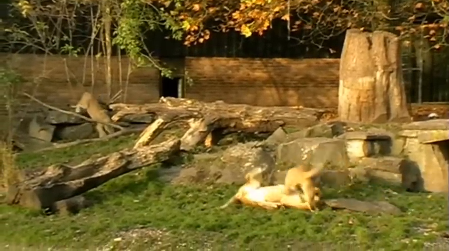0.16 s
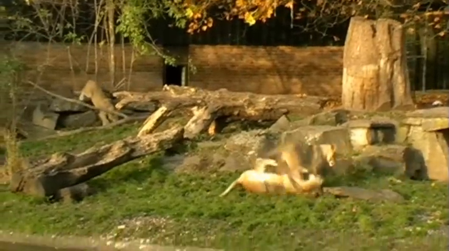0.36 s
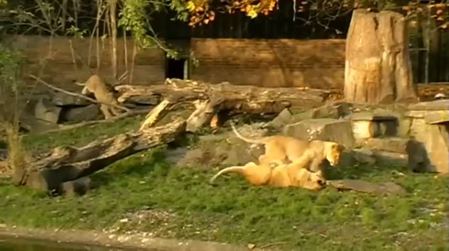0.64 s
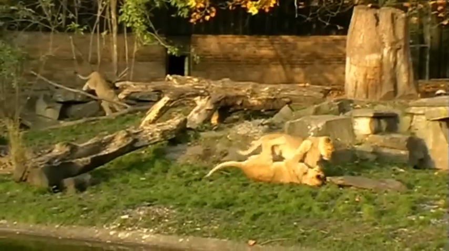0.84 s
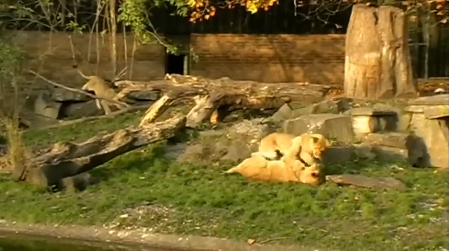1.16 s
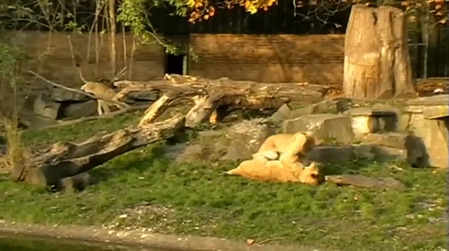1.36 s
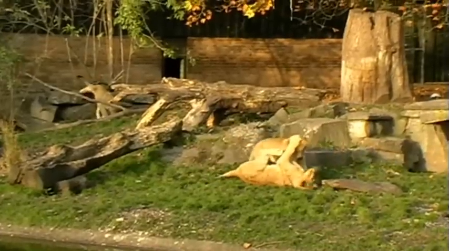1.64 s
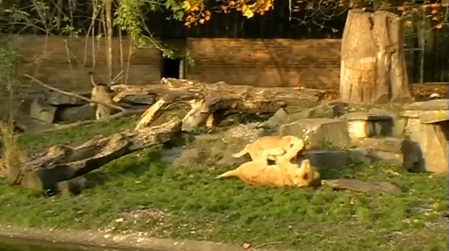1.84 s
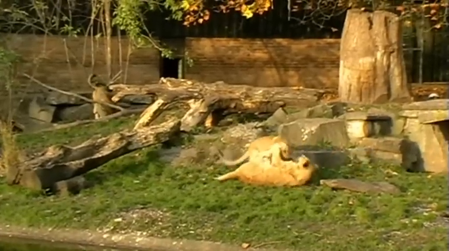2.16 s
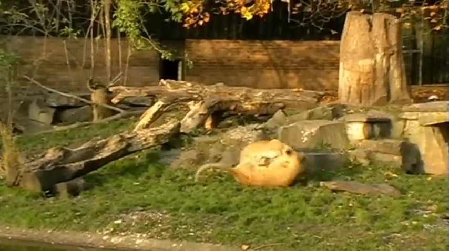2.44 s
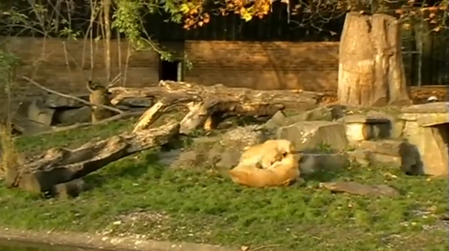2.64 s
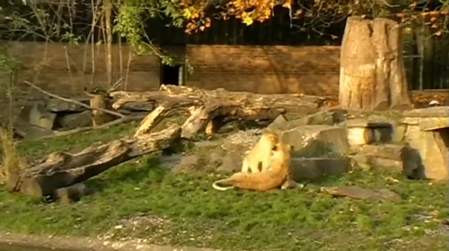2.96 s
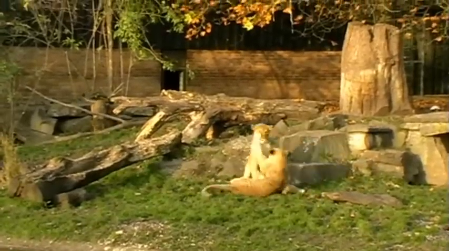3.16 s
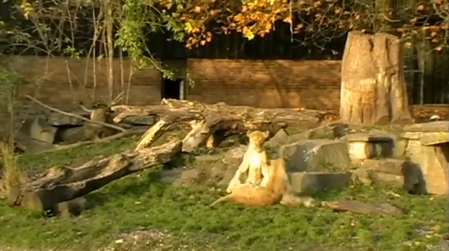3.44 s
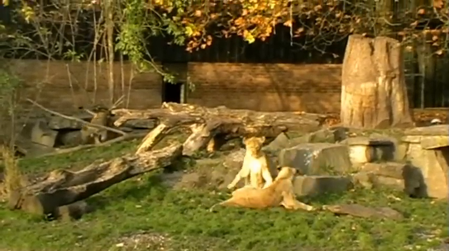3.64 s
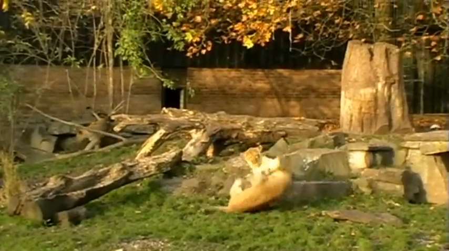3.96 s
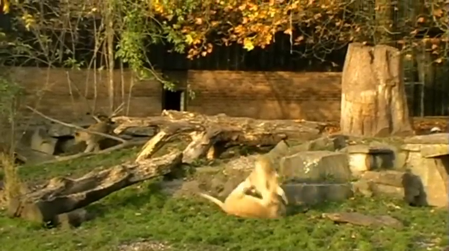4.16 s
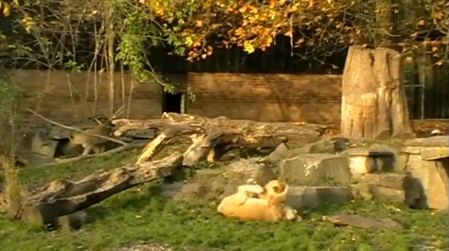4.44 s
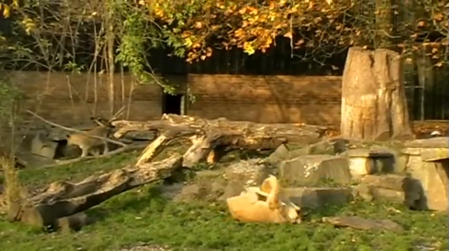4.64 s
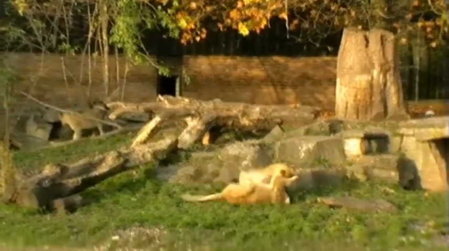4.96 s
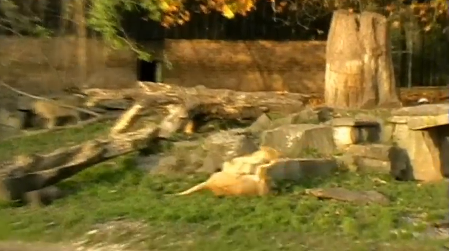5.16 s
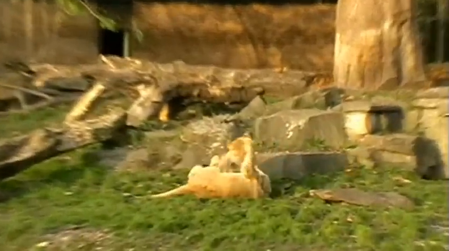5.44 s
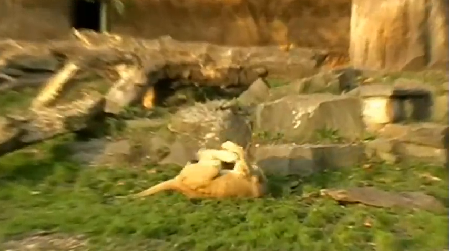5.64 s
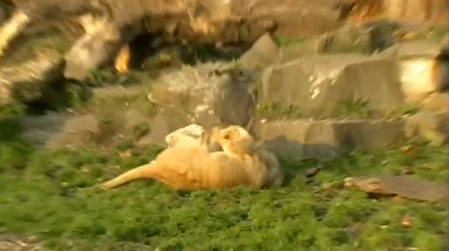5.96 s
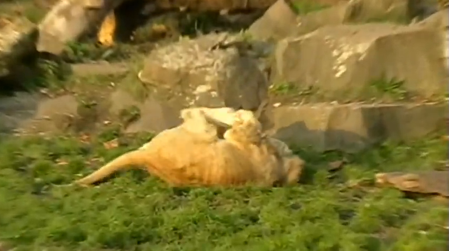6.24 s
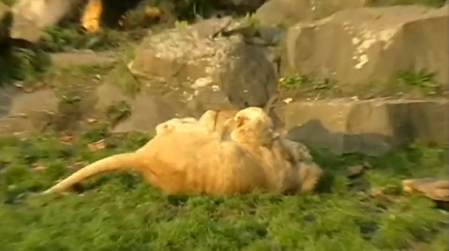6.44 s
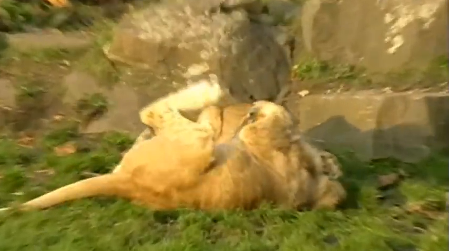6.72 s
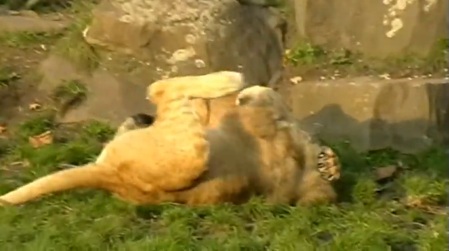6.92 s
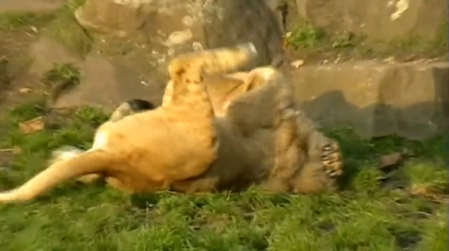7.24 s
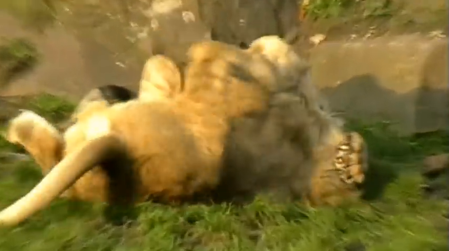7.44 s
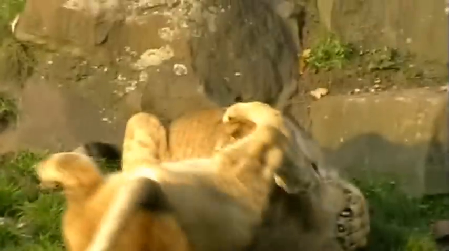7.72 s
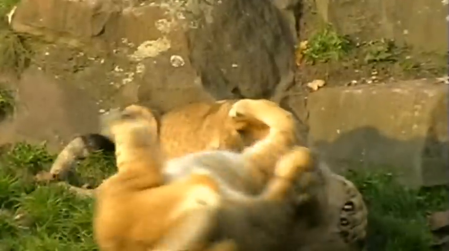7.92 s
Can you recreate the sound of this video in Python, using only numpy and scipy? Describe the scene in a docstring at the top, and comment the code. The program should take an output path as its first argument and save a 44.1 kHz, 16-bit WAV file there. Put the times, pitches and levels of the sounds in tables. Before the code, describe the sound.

An adult lion roars in a hard-walled, echoing zoo enclosure. A tailing moan opens, then heavy roars fall in pitch and turn raspy, with hooting moans between them. A clean hum leads into a roar halfway through; afterward come short grunts about a second apart. Faint scuffs, a few sharper ticks and one tiny squeak sound close by. Steady low-toned noise lies beneath, captured by two close-set microphones.

```python
"""A hard-walled, echoing zoo enclosure, heard by two microphones set close together. A lion roars:
each roar falls in pitch and grows raspier, twice led in by a clean hum, with moans in between; the
bout shortens to spaced grunts. The voice is pulses and turbulence of the vocal folds through resonances
of throat and mouth, with hiss on top. Shaped noise makes scuffs and a brief hiss nearby, gliding tones
a squeak. Decaying noise echoes the sounds, standing waves ring, and steady coloured noise lies beneath."""
import sys
import numpy as np
from scipy import signal
from scipy.fft import rfft, irfft
from scipy.io import wavfile
from scipy.ndimage import uniform_filter1d, map_coordinates

SR = 44100
rng = np.random.default_rng(int(sys.argv[2]) if len(sys.argv) > 2 else 0)


def wrap_up_sound(samples):
    """Save the sound to the file named by the first command line argument, as 16-bit audio."""
    columns = np.atleast_2d(samples).T
    # keep every value between -1 and 1, then stretch to whole-number steps
    tamed = np.clip(columns, -1, 1)
    steps = np.round(tamed * 32767).astype(np.int16)
    wavfile.write(sys.argv[1], SR, steps)


N = 356724

# Roars; levels are before each layer's trim: start_s, length_s, time_to_top_pitch_s, top_pitch_hz,
# end_pitch_hz, tone_break (share of length), throat_hz, mouth_hz,
# chest_db, throat_db, rasp_db, hollow_db, air_db
ROAR_CALLS = [ (.099, 0.6, .2, 174.1, 132.1, 0.71, 372.6, 1063, -14.5, -28.5, -31, -36, -45.5),
              (1.456, 0.4, 0.11, 146, 131.7, 0.67, 370, 1058, -15, -29.5, -30.5, -34.5, -46.5),
              (3.2, .35, 0.0056, 176, 143.6, 0.68, 375.7, 1006, -15.5, -27.5, -30, -34.5, -53),
              (4.279, 0.25, 0.0043, 141.1, 128.4, 0.82, 359.6, 1046, -17, -33.5, -34, -30.5, -51),
              (5.307, .35, 0.0025, 144.1, 130.3, 0.79, 373.7, 1046, -18, -28.5, -30.5, -33, -48),
              (6.413, .29, 0.0071, 141.4, 129.1, 0.72, 370, 1074, -17, -31.5, -32.5, -30.5, -48.5),
              (7.442, 0.3, 0.0081, 146.3, 128.6, 0.6, 376.7, 1061, -18, -30.5, -33, -34.5, -52.5), ]
# Moans between the roars; levels before trim:
# start_s, length_s, crest (share of length), top_pitch_hz, chest_db, husk_db
MOAN_CALLS = [ (-.2, 0.36, 0.52, 201, -6, -30), (.85, 0.48, 0.45, 198.3, -10.5, -33),
              (1.897, 0.32, 0.35, 193.8, -9.5, -34), (3.83, 0.24, 0.24, 178.1, -15.5, -36),
              (6.83, 0.16, 0.19, 181.7, -25, -48), (6.99, 0.095, 0.58, 180, -27, -53), ]
# Hums that lead in two roars; levels before trim:
# start_s, length_s, mid_pitch_hz, octave_db, throat_db, rasp_db, husk_db, air_db
HUM_CALLS = [(2.811, .42, 184.5, -24, -30, -38, -39, -62),
             (5.03, 0.264, 157.2, -50.5, -39, -33.5, -42.5, -58)]
# Chest loudness of each hum, one list a hum, before trim: time_s, level_db
HUM_LOUDNESS = [
    [(2.79, -37), (2.826, -21), (2.902, -12.5), (2.978, -10), (3.03, -23), (3.09, -12), (3.185, -16),
     (3.22, -40)],
    [(5.02, -36), (5.1, -31), (5.188, -22.5), (5.262, -23.5), (5.3, -22)],
]

# Resonances, all: pitch_hz, width_hz, relative level_db
# Throat in roar and hum; a roar scales it so that the first row meets its own throat_hz
THROAT_MODES = [(367.3, 15.1, 16.5), (397.8, 34.4, 0.5), (464, 40, -10)]
# Open mouth in a roar, scaled by the jaw
ROAR_MOUTH_MODES = [(967, 41, 10.5), (1035.3, 37, 19), (1095, 68, 7.5), (1280, 81, 4), (1510, 30, -11.5)]
# Mouth as it closes late in a roar
CLOSING_MOUTH_MODES = [(698, 27, -0.5), (827, 41, -7), (250, 124, -8), (509, 26, -22.5), (1311, 68, -18.5)]
# High resonances of the open mouth
SNARL_MODES = [(1954, 37, 4.5), (2223, 53, 2), (3160, 280, -10.5), (4410, 280, -13.5), (5800, 190, -13.5)]
# Mouth in a moan
MOAN_MOUTH_MODES = [(382, 29, -2.5), (696, 45, -6), (958, 33, 8), (1010, 39, 3.5), (1118, 49, 3),
                    (1345, 195, -5.5), (1598, 40, -8), (2090, 57, -15)]
# Throat in a moan, scaled with the pitch
MOAN_THROAT_MODES = [(260, 31, 8), (456.4, 29, 11), (572, 29, -1.5), (730, 100, -6), (1074, 54, -7.5),
                     (1300, 58, -7), (1485, 120, -15)]
# Mouth in a hum
HUM_MOUTH_MODES = [(236, 30, -2.5), (440, 45, 1.5), (547, 26, 3.5), (723, 47, -1.5), (1077, 140, 2.5),
                   (1268, 73, -1.5), (1497, 62, -2.5), (1646, 28, -4)]
# Mouth ringing early in a hum
HUM_RING_MODES = [(943, 45, 3.5), (980, 52, -7), (1083, 56, 0.5)]
# Standing waves of the enclosure
STANDING_WAVES = [(133.5, 1.8, -14), (159, 0.72, -5.5), (187, 2.8, -29), (264.3, 9.2, 0.5), (363, 2, 2),
                  (559, 7.5, 0), (694, 9.1, -6.5)]
# Chest, one mode for roars and one for moans and hums
ROAR_CHEST_MODES, MOAN_CHEST_MODES = [(180.8, 52, 0)], [(184, 43, 0)]

# Time for the enclosure's echo to fall by 60 dB: pitch_hz, decay_s
ECHO_DECAY = [(130, 1.35), (400, 1.16), (1000, 1.48), (2260, 1.14), (4500, 0.6), (12000, 0.5)]
# Strength of the echo: pitch_hz, level_db
ECHO_STRENGTH = [(130, -10), (190, -6.5), (260, -1.5), (400, 0), (1000, -3), (3000, -2), (12000, -4.5)]
# Scuffs nearby, the long tails of two of them, and a brief swell of hiss; level before trim:
# start_s, level_db, rise_s, decay_s, left_minus_right_db
SCUFF_EVENTS = [(0.564, -46.5, 0.03, 0.024, 0), (1.696, -51, .012, .015, 5), (1.8, -52, .012, .02, 0),
                (2.395, -58, .006, 0.017, 3), (3.4, -52, 0.031, 0.092, 6), (3.96, -44.5, 0.032, 0.014, -6),
                (4.028, -35, 0.0029, 0.0055, -5), (4.043, -44, .002, 0.0044, -4),
                (4.089, -41.5, 0.0026, 0.0077, -11), (5.123, -50.5, 0.021, 0.02, 2),
                (5.61, -46.5, .016, 0.024, 1), (5.71, -38, 0.0017, 0.015, 7), (5.75, -60, 0.045, 0.086, -4),
                (6.303, -54.5, 0.00078, 0.0047, -2), (6.643, -36, 0.0029, 0.028, 7),
                (6.708, -48.5, 0.0083, 0.12, -3)]
# A squeak's lead-in, partials and thin after-note: start_s, length_s, start_hz, end_hz, level_db
SQUEAK_TONES = [(4.089, .014, 3250, 2750, -38), (4.102, .05, 4540, 4810, -47.5),
                (4.102, .05, 6810, 7215, -49.5), (4.102, .05, 9080, 9620, -57),
                (4.102, .05, 11350, 12025, -60), (4.07, .022, 4300, 4480, -53),
                (4.18, .065, 8650, 8250, -65)]
# Colour of the hiss in the mouth: pitch_hz, relative level_db (per hertz)
AIR_TINT = [(1900, -2.5), (2300, -5), (2600, -3.5), (3200, -5), (3900, -5.5), (4500, -8.5), (5000, -10.5),
            (6300, -9), (8500, -11.5), (10500, -9), (12500, -15.5), (15000, -59)]
# Colour of the scuffs and the brief hiss: pitch_hz, relative level_db (per hertz)
SCUFF_TINT = [(1060, -20.5), (1800, -9.5), (2210, -9.5), (2390, -11.5), (3150, -7.5), (3560, -8),
              (8280, -11), (12100, -17.5), (15000, -24.5)]
# Colour of the steady background: pitch_hz, relative level_db (per hertz)
FLOOR_TINT = [(15, -76), (25, -43), (54, -18.5), (101, -3), (140, -11), (187, -3.5), (235, -11.5),
              (301, -17), (450, -14), (604, -21), (833, -17), (903, -22.5), (1060, -16), (1630, -24.5),
              (2130, -30.5), (2700, -34), (3090, -38), (10000, -46), (15000, -52.5)]
# Likeness of the two microphones for sound from all sides: pitch_hz, likeness (0-1)
MICROPHONE_LIKENESS = [(30, 0.87), (130, 1), (350, 0.96), (700, 0.83), (1400, 0.75), (2800, 0.53),
                       (12000, 0.7)]

# How each part of a call swells: crest (share of length), rise_db, fall_db
CHEST_SWELL, THROAT_SWELL, RASP_SWELL = (0.39, 12.1, 2.9), (0.33, 10.2, 18.7), (0.22, 11, 10.9)
HOLLOW_SWELL, AIR_SWELL = (0.79, 19.7, 13), (0.56, 4.6, 6)
HUSK_SWELL, MOAN_THROAT_SWELL = (0.49, 14, 8), (0.25, 5.1, 10.7)
HUM_THROAT_SWELL, HUM_HUSK_SWELL = (0.93, 25, 2.3), (0.11, 6.7, 2.1)
HUM_RASP_SWELL, HUM_OCTAVE_SWELL = (0.3, 53, 20), (0.53, 49, 0.96)
MOAN_RISE_DB, MOAN_FALL_DB = 10.5, 19.5

ROAR_ROUGH = (.26, .56)   # roughness 0-1 while the tone holds and once broken, before slackness adds
MOAN_ROUGH, HUM_ROUGH = (.32, .58), (.16, .42)   # roughness 0-1 at start and end
STEADY_HZ, ROUGHER_PER_HZ = 148, .005   # slack folds roughen the further the pitch sinks below this
ROUGHEN_S = 0.045   # how gradually the folds lose their beat
BREAK_DB, BREAK_S = -8, 0.0047   # the chest tone drops this far, about this fast, as the beat is lost
ROAR_RISE_HZ_PER_S, ROAR_SAG_RATE = 105, 2.0   # climb, then relaxation in e-foldings over the fall
MOAN_TOP_S, MOAN_RISE_HZ_PER_S, MOAN_SAG_HZ_PER_S2 = .12, 90.1, 380   # brief climb, then sag
HUM_SCOOP_HZ, HUM_SCOOP_S = 7.85, .035   # a hum slides up into its note
MOUTH_HZ, MOUTH_CLOSES = 1036, 0.069   # mouth reference; share by which it sinks at a roar's ends
THROAT_WAVER = 0.0083   # typical share by which the resonances wander
MOAN_THROAT_AT_HZ = 196.2   # pitch at which the moan's throat table holds
AIR_FADE_S = .035   # hiss builds up and dies away as the mouth opens and shuts
CHEST_CUT_HZ = 123   # the voice is cut below its lowest tone
SETTLE_DB, SETTLE_SLOWER = -12.5, 4.2   # settling tail of a scuff row: its level, times longer it lasts
FLOOR_DB, CUTOFF_HZ = -41.32, 15300


def from_db(db):
    """Decibels to gain."""
    return 10 ** (np.asarray(db) / 20)


def rms_one(x):
    """Scale to unit power."""
    return x / np.sqrt(np.mean(x ** 2) + 1e-20)


def at_hz(points, hz):
    """Read a table on a log-frequency axis."""
    f, value = np.transpose(points)
    return np.interp(np.log(hz + 1e-3), np.log(f), value)


def drift(rate, size):
    """Smooth chance of spread about 1, with rate new values a second."""
    knots = rng.standard_normal(4000)
    return map_coordinates(knots, [np.arange(size) * rate / SR], order=3, mode="wrap")


def resonate(x, modes):
    """Parallel resonances, each applied twice so that the valleys stay dark."""
    out = 0
    for hz, width, db in modes:
        # each pass is wider, so that the pair has the stated width
        r = np.exp(-np.pi * width / np.sqrt(np.sqrt(2) - 1) / SR)
        edge = (1 - r * r) / 2
        section = [edge, 0, -edge, 1, -2 * r * np.cos(2 * np.pi * hz / SR), r * r]
        out = out + from_db(db) * signal.sosfilt([section, section], x)
    return out


def resonate_moving(x, modes, scale):
    """Resonances scaled from moment to moment, by filtering on a warped clock."""
    clock = np.cumsum(scale)
    steps = np.arange(int(clock[-1]) + 1)
    warped = np.interp(steps, clock, x)
    return np.interp(clock, steps, resonate(warped, modes))


def even(x):
    """Hold the short-term power at 1."""
    return x / np.sqrt(uniform_filter1d(x * x, size=1800).clip(1e-12))


def stereo_spectrum(size):
    """Spectra of white noise at two close microphones, most alike in the bass."""
    hz = np.arange(size // 2 + 1) * SR / size
    mid, side = rfft(rng.standard_normal((2, size)))
    alike = np.clip(at_hz(MICROPHONE_LIKENESS, hz), 0, 1)
    shared = np.sqrt(1 + alike) * mid
    opposed = np.sqrt(1 - alike) * side * [[1], [-1]]
    return hz, (shared + opposed) / np.sqrt(2)


def noise(colour):
    """Stereo noise of a given colour, unit power."""
    hz, white = stereo_spectrum(N)
    return rms_one(irfft(white * from_db(at_hz(colour, hz)), N))


def call_span(s, length, fade=.015):
    """Sample indices of one call, its soft-edged gate, time since its start and progress 0-1."""
    at = np.arange(max(int((s - fade) * SR), 0), min(int((s + length + fade) * SR), N))
    t = at / SR - s
    gate = np.clip(np.minimum(t, length - t) / fade + 1, 0, 1)
    return at, gate, t, np.clip(t / length, 0, 1)


def swell(progress, crest, rise_db, fall_db, roundness=2):
    """An arch in dB: up to 0 at the crest, then down again."""
    crest = np.clip(crest, .02, .98)
    before = np.maximum(1 - progress / crest, 0)
    after = np.maximum((progress - crest) / (1 - crest), 0)
    return -rise_db * before ** roundness - fall_db * after ** roundness


def tiring(progress, start, end):
    """The folds grow rougher as the lungs empty."""
    return start + (end - start) * progress ** 2


def vocal_folds(pitch, rough):
    """Chest tone, one uneven pulse per cycle, and turbulence while the folds are open."""
    size = len(pitch)
    cycles = np.cumsum(pitch * (1 + .05 * rough * drift(110, size))) / SR
    strength = from_db(6 * rough * drift(70, size))
    # the folds snap shut a little early or late, which breaks up the high partials
    closure = cycles + .06 * rough * drift(300, size)
    pulses = rms_one(np.diff(np.floor(closure), prepend=0) * strength)
    opening = (1 + np.cos(2 * np.pi * cycles)) / 2
    turbulence = rms_one(rng.standard_normal(size) * opening ** 2 * strength)
    # the heavy folds flutter, so the chest tone throbs with the strength of the pulses
    chest = np.sqrt(2) * rms_one(strength) * np.sin(2 * np.pi * cycles)
    return chest, pulses, turbulence


def wheeze(size):
    """Thin hiss through a half-closed mouth, unit power."""
    modes = [(2580, 1100, 5.5), (4500, 2500, 3.0), (5550, 780, 0.0), (6800, 1700, -6)]
    return even(resonate(rng.standard_normal(size), modes))


def moan(row, chest_trim_db=-1, throat_db=1.5, rasp_db=-2.0, wheeze_db=-24, rumble_db=-9):
    """A higher, hooting fold tone with rumble, wheeze and a husk that peaks in throat, then mouth."""
    s, length, crest, top_hz, chest_level, husk_level = row
    at, gate, t, progress = call_span(s, length)
    climb = MOAN_RISE_HZ_PER_S * (MOAN_TOP_S - t)
    sag = MOAN_SAG_HZ_PER_S2 * (t - MOAN_TOP_S) ** 2
    pitch = top_hz - np.maximum(climb, sag)
    rough = tiring(progress, *MOAN_ROUGH)
    chest, pulses, turbulence = vocal_folds(pitch, rough)
    rumble = rough * from_db(rumble_db) * even(resonate(turbulence, MOAN_CHEST_MODES))
    buzz = (1 - rough) * pulses + 0.87 * turbulence
    waver = 1 + THROAT_WAVER * drift(25, len(at))
    larynx = waver * pitch / MOAN_THROAT_AT_HZ
    mouth = from_db(rasp_db) * even(resonate_moving(buzz, MOAN_MOUTH_MODES, waver))
    throat = from_db(throat_db) * even(resonate_moving(buzz, MOAN_THROAT_MODES, larynx))
    throat += from_db(wheeze_db) * wheeze(len(at))
    # the tone comes to a point while the husk swells gently
    chest_swell = swell(progress, crest, MOAN_RISE_DB, MOAN_FALL_DB, roundness=0.7)
    voice = from_db(chest_level + chest_trim_db + chest_swell) * (chest + rumble)
    voice += from_db(husk_level + swell(progress, *HUSK_SWELL)) * mouth
    voice += from_db(husk_level + swell(progress, *MOAN_THROAT_SWELL)) * throat
    return np.bincount(at, gate * voice, N)


def roar(row, chest_trim_db=-2.0, throat_trim_db=-1.5, rasp_trim_db=-2.5, hollow_trim_db=-1.86,
         rumble_db=-6.0, snarl_db=-13.5, rattle_db=1.86):
    """A chest tone that breaks into a rough rumble, ringing the throat and the moving mouth."""
    (s, length, top_s, top_hz, end_hz, breaks, throat_hz, mouth_hz,
     chest_level, throat_level, rasp_level, hollow_level, _) = row
    at, gate, t, progress = call_span(s, length)
    fall = np.clip((t - top_s) / (length - top_s), 0, 1)
    sag = np.expm1(-ROAR_SAG_RATE * fall) / np.expm1(-ROAR_SAG_RATE)
    pitch = top_hz - ROAR_RISE_HZ_PER_S * np.maximum(top_s - t, 0) - (top_hz - end_hz) * sag
    since_break = t - breaks * length
    rough = np.interp(np.tanh(since_break / ROUGHEN_S), [-1, 1], ROAR_ROUGH)
    rough = np.minimum(rough + ROUGHER_PER_HZ * np.maximum(STEADY_HZ - pitch, 0), 1)
    chest, pulses, turbulence = vocal_folds(pitch, rough)
    buzz = (1 - rough) * pulses + rough * turbulence / 2
    chest = chest * from_db(BREAK_DB * (1 + np.tanh(since_break / BREAK_S)) / 2)
    jaw = mouth_hz / MOUTH_HZ * (1 - MOUTH_CLOSES * (2 * progress - 1) ** 2)
    waver = 1 + THROAT_WAVER * drift(25.2, len(at))
    larynx = throat_hz / THROAT_MODES[0][0] * waver
    rumble = rough * from_db(rumble_db) * even(resonate(turbulence, ROAR_CHEST_MODES))
    # rough, throbbing airflow also rings the high resonances of the mouth
    snarl = np.sqrt(rough) * from_db(snarl_db) * even(resonate_moving(turbulence, SNARL_MODES, waver))
    throat = even(resonate_moving(buzz, THROAT_MODES, larynx))
    rasp = from_db(rasp_trim_db) * even(resonate_moving(buzz, ROAR_MOUTH_MODES, jaw)) + snarl
    hollow = even(resonate(buzz, CLOSING_MOUTH_MODES))
    chest_swell = swell(progress, *CHEST_SWELL, roundness=3.0)
    voice = from_db(chest_level + chest_trim_db + chest_swell) * (chest + rumble)
    voice += from_db(throat_level + throat_trim_db + swell(progress, *THROAT_SWELL)) * throat
    voice += from_db(rasp_level + swell(progress, *RASP_SWELL)) * rasp
    voice += from_db(hollow_level + hollow_trim_db + swell(progress, *HOLLOW_SWELL)) * hollow
    voice *= from_db(rattle_db * drift(89.95, len(at)))   # the throat rattles unevenly
    return np.bincount(at, gate * voice, N)


def rushing_air(air_trim_db=-0.85, flutter_db=2.5, surge_db=2.0):
    """Hiss at the lion's teeth and tongue, swelling and fading unevenly with each roar and hum."""
    level = np.zeros(N)
    for s, length, *_, db in ROAR_CALLS + HUM_CALLS:
        at, gate, t, progress = call_span(s, length, AIR_FADE_S)
        air_swell = swell(progress, *AIR_SWELL, roundness=5.2)
        level[at] += gate ** 2 * from_db(db + air_trim_db + air_swell)
    unevenness = from_db(flutter_db * drift(260, N) + surge_db * drift(28, N))
    return level * unevenness * noise(AIR_TINT)


def scuffs(grain_db=3, scuff_trim_db=0):
    """Each row is a swell of noise grains with a settling tail; some rows prolong the scuff before."""
    t, level = np.arange(N) / SR, np.zeros((2, N))
    for s, db, rise, decay, pan_db in SCUFF_EVENTS:
        age = np.maximum(t - s - rise, 0) / decay
        dying = np.exp(-np.minimum(age, 20))
        dying += from_db(SETTLE_DB) * np.exp(-np.minimum(age / SETTLE_SLOWER, 20))
        sides = from_db([[db + pan_db / 2], [db - pan_db / 2]])
        level += sides * np.clip((t - s) / rise, 0, 1) * dying
    return level * from_db(scuff_trim_db + grain_db * drift(700, N)) * noise(SCUFF_TINT)


def hum(row, loudness, chest_trim_db=0.2, rumble_db=-7, wheeze_db=-20, snarl_db=-26, sag_hz_per_s=17):
    """A nearly level fold tone, husky at first; its octave crests midway, its throat near the end."""
    s, length, hz, octave_level, throat_level, rasp_level, husk_level, _ = row
    at, gate, t, progress = call_span(s, length)
    rough = tiring(progress, *HUM_ROUGH)
    scoop = HUM_SCOOP_HZ * np.exp(-t / HUM_SCOOP_S)
    pitch = hz - sag_hz_per_s * (t - length / 2) - scoop
    chest, pulses, turbulence = vocal_folds(pitch, rough)
    buzz = (1 - rough) * pulses + rough * turbulence
    rumble = rough * from_db(rumble_db) * even(resonate(turbulence, MOAN_CHEST_MODES))
    husk = even(resonate(pulses + turbulence, HUM_MOUTH_MODES)) + from_db(wheeze_db) * wheeze(len(at))
    snarl = from_db(snarl_db) * even(resonate(turbulence, SNARL_MODES))
    throat = even(resonate(buzz, THROAT_MODES)) + snarl
    ring = even(resonate(buzz, HUM_RING_MODES))
    # doubling the phase of the chest tone gives its octave
    octave = np.sqrt(2) * np.cos(2 * np.angle(signal.hilbert(chest)))
    octave_swell = swell(progress, *HUM_OCTAVE_SWELL) + 2.1 * drift(45, len(at))
    chest_level = np.interp(at / SR, *np.transpose(loudness))
    voice = from_db(chest_level + chest_trim_db) * (chest + rumble)
    voice += from_db(throat_level + swell(progress, *HUM_THROAT_SWELL)) * throat
    voice += from_db(rasp_level + swell(progress, *HUM_RASP_SWELL, roundness=1.06)) * ring
    voice += from_db(octave_level + octave_swell) * octave
    voice += from_db(husk_level + swell(progress, *HUM_HUSK_SWELL)) * husk
    return np.bincount(at, gate * voice, N)


def squeaks(waver=0.013):
    """Short, unsteady gliding sine tones."""
    out = np.zeros(N)
    for s, length, start_hz, end_hz, db in SQUEAK_TONES:
        size = int(length * SR)
        hz = np.linspace(start_hz, end_hz, size) * (1 + waver * drift(635, size))
        tone = np.sin(2 * np.pi * np.cumsum(hz) / SR)
        out[int(s * SR) + np.arange(size)] += from_db(db) * signal.windows.tukey(size) * tone
    return out


def enclosure(x, first_echo_s=0.011):
    """Dense wall echoes, each band dying at its own rate, and a few ringing standing waves."""
    size = 3 * SR // 2
    t = np.arange(size) / SR
    hz, white = stereo_spectrum(size)
    edges = np.r_[0, np.geomspace(100, 12800, num=8), SR]
    response = 0
    for low, high in zip(edges, edges[1:]):
        in_band = (hz >= low) & (hz < high)
        band = irfft(white * in_band * from_db(at_hz(ECHO_STRENGTH, hz)), size)
        t60 = at_hz(ECHO_DECAY, np.sqrt(low * high))
        decay = from_db(-60 * t / t60) * (t > first_echo_s)
        response = response + band * decay / np.sqrt(np.sum(decay ** 2))
    echoes = signal.fftconvolve(x[None], response, axes=1)[:, :N]
    return echoes + resonate(x, STANDING_WAVES)


def background():
    """Steady coloured noise from all sides."""
    return from_db(FLOOR_DB) * noise(FLOOR_TINT)


def scene(near_echo_db=-4):
    """The lion, small noises nearby, their echo and the steady background."""
    roars = sum(map(roar, ROAR_CALLS))
    hums = sum(map(hum, HUM_CALLS, HUM_LOUDNESS))
    voice = roars + hums + sum(map(moan, MOAN_CALLS))
    voice = signal.sosfilt(signal.butter(4, CHEST_CUT_HZ, "high", fs=SR, output="sos"), voice)
    lion = voice + rushing_air()
    near = scuffs() + squeaks()
    into_room = (lion + from_db(near_echo_db) * near).mean(axis=0)
    return lion + near + enclosure(into_room) + background()


def record(dry, left_lean=0.074):
    """The upper middle leans to the left microphone; the top is cut."""
    middle = signal.sosfilt(signal.butter(1, [700, 7000], "band", fs=SR, output="sos"), dry)
    leaning = dry + left_lean * middle * [[1], [-1]]
    return signal.sosfilt(signal.ellip(10, .1, 80, CUTOFF_HZ, fs=SR, output="sos"), leaning)


dry = scene()
out = record(dry)
wrap_up_sound(out)
```